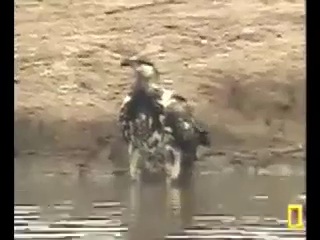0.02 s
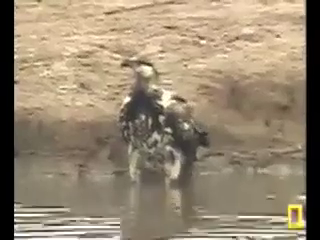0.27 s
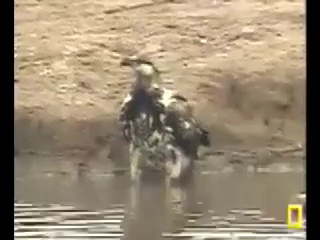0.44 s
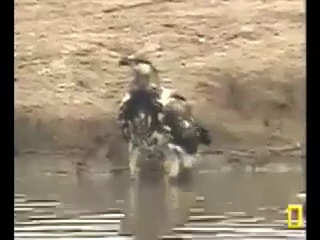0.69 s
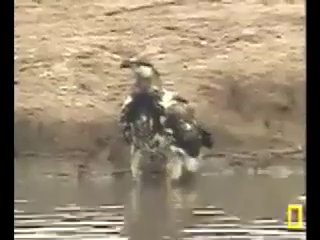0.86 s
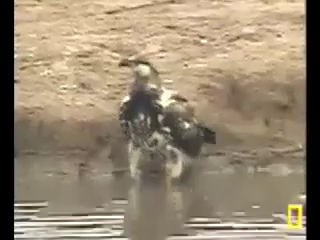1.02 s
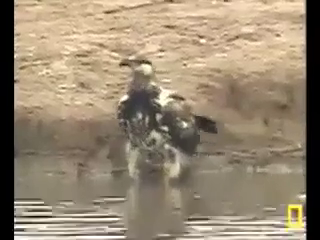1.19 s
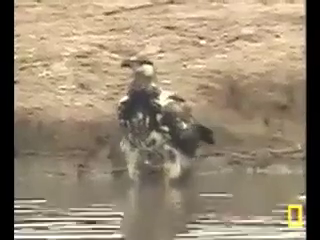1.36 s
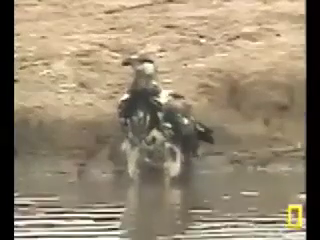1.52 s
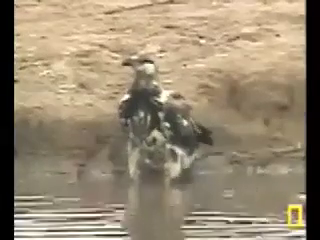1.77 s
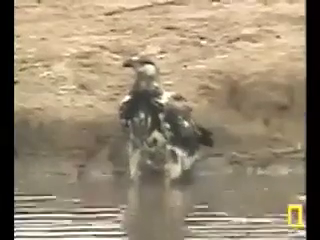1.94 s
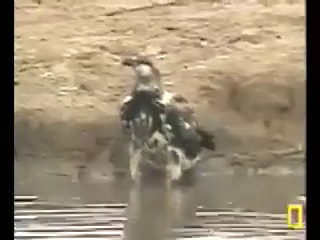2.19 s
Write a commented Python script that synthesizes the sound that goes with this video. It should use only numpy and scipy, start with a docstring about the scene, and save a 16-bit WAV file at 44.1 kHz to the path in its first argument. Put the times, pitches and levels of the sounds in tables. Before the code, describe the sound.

An eagle calls outdoors over soft air and faint distant birds: a downward whistle, then descending yelps growing quicker and quieter. Water swishes and gulps briefly around the first yelps, and light wind buffets the microphone near the end.

```python
"""Over soft outdoor air and faint, far pipes of small birds, a fish eagle gives one falling whistle,
then a run of yelps that sink, quicken and fade; the two sides of its syrinx beat against each other.
The banks of the waterhole echo the birds. Something like stirred water swishes and gulps as the run
begins, and wind bumps the microphone at the end.
The recorder is narrow in band and limits the loud notes. A thin hiss rises and falls with the level."""
import sys
import numpy as np
from scipy import signal
from scipy.fft import rfft, irfft, next_fast_len
from scipy.io import wavfile
from scipy.ndimage import uniform_filter1d, minimum_filter1d, map_coordinates

SR = 44100
rng = np.random.default_rng(int(sys.argv[2]) if len(sys.argv) > 2 else 0)


def generate_wav(sig):
    """Save sig (samples, or channels by samples) to the path in sys.argv[1] as 16-bit PCM at SR."""
    pcm = np.round(np.clip(np.atleast_2d(sig).T, -1, 1) * 32767).astype(np.int16)
    wavfile.write(sys.argv[1], SR, pcm)


N = 97020


def amp(db):
    """Decibel law: 20 dB is a factor of ten in amplitude."""
    return 10 ** (np.asarray(db) / 20)


def unit(x):
    """Normalisation to rms 1."""
    return x / np.sqrt(np.mean(x ** 2) + 1e-20)


def clock():
    """Uniform sampling: the time of each sample in seconds."""
    return np.arange(N) / SR


def level(times_s, db):
    """Amplitude envelope: gain along a dB curve, fading to silence outside it."""
    t = clock()
    inside = ((t >= times_s[0]) & (t <= times_s[-1])).astype(float)
    return amp(np.interp(t, times_s, db)) * uniform_filter1d(inside, size=200)


def wobble(rate):
    """Random modulation: a smooth curve of rms 1 through rate knots a second."""
    knots = rng.standard_normal(size=8192)
    return unit(map_coordinates(knots, [clock() * rate], mode="wrap"))


def filtered(x, response):
    """Linear filtering: the spectrum is multiplied by a frequency response."""
    size = next_fast_len(N + SR // 2)
    return irfft(rfft(x, size) * response(np.fft.rfftfreq(size, 1 / SR)), size)[:N]


def coloured(x, spectrum):
    """Spectral shaping by (frequency_hz, gain_db) points, at rms 1."""
    points_hz, db = np.transpose(spectrum)
    return unit(filtered(x, lambda hz: amp(np.interp(np.log(hz + 1), np.log(points_hz), db))))


def noise(spectrum):
    """Filtered white noise of rms 1."""
    return coloured(rng.standard_normal(N), spectrum)


def patchy_noise(spectrum, depth_db):
    """Time-frequency modulation: noise whose strength varies in short, narrow patches."""
    cells = signal.stft(rng.standard_normal(N), nperseg=1024)[2]
    patches = uniform_filter1d(rng.standard_normal(cells.shape), size=4, axis=0)
    patches = unit(uniform_filter1d(patches, size=4, axis=1))
    mottled = signal.istft(cells * amp(depth_db * patches), nperseg=1024)[1][:N]
    return coloured(mottled, spectrum)


# Spectrum of the outdoor background: frequency_hz, gain_db
AIR_SPECTRUM = [(25, -7), (70, -8), (140, -10), (280, -3.5), (550, 5.5), (1000, 0.5), (2000, -4.5),
                (3000, -2), (3550, -7), (3900, -25.5), (4500, -52.5)]
# Its slow change in strength: time_s, level_db
AIR_ENVELOPE = [(0, -42), (.2, -43), (0.601, -46), (1.4, -45.5), (2.2, -42.5)]


def air():
    """Ambient noise: a soft, broad background that dips and recovers."""
    gain = amp(np.interp(clock(), *np.transpose(AIR_ENVELOPE)))
    return gain * patchy_noise(AIR_SPECTRUM, depth_db=2.44)


def voice(hz, roughness, jitter_hz=16, waver_db=1.8):
    """Random frequency and amplitude modulation spread a pure tone into a narrow band."""
    phase = 2 * np.pi * np.cumsum(hz + jitter_hz * wobble(rate=260)) / SR
    flutter = (wobble(rate=420) + 1j * wobble(rate=420)) / np.sqrt(2)
    tone = np.imag((1 + roughness * flutter) * np.exp(1j * phase))
    return unit(amp(waver_db * wobble(rate=190)) * tone)


def note(start_s, length_s, pitch_hz, fall_hz, db, roughness, attack_s=.017, release_s=.011):
    """Exponential relaxation: a note starts sharp, settles toward its pitch and dies quickly."""
    age = np.maximum(clock() - start_s, 0)
    rise = np.sin(np.pi / 2 * np.minimum(age / attack_s, 1)) ** 2
    decay = np.exp(-np.maximum(age - length_s, 0) / release_s)
    glide_hz = pitch_hz + fall_hz * np.exp(-3.33 * age / length_s)
    return amp(db) * rise * decay * voice(glide_hz, roughness)


# Notes of distant small birds: start_s, length_s, pitch_hz, fall_hz, level_db, roughness
FAR_NOTES = [(0, 0.01, 3436, 60, -43, 0.4), (0.469, 0.056, 3230, 200, -39, 1.5),
             (0.58, 0.029, 1760, 60, -41.5, 0.49), (0.619, 0.042, 2350, 60, -32.5, 0.62),
             (1.515, 0.06, 1738, 50, -42, 1.6), (1.607, 0.013, 3330, 120, -40, 1.1),
             (1.669, .035, 2990, 60, -43.5, 1.8)]


def far_birds():
    """Modulation sidebands smear the pitch of a few faint pipes."""
    return sum(note(*row) for row in FAR_NOTES)


# Main voice of the eagle's whistle: time_s, pitch_hz, level_db
WHISTLE_MAIN = [(.206, 3530, -39), (.219, 3572, -22), (.23, 3325, -15.5), (.241, 3347, -14),
                (.247, 3150, -11.5), (.257, 3170, -13), (.267, 2936, -15), (.275, 3088, -14),
                (.285, 2909, -16.5), (.317, 2927, -10), (.326, 2932, -37), (.34, 2953, -29),
                (.357, 2920, -35)]
# Weaker second voice of the syrinx: time_s, pitch_hz, level_db
WHISTLE_SECOND = [(.25, 3345, -19.5), (0.279, 3240, -37), (0.318, 3304, -28.5), (0.347, 3264, -49),
                  (0.362, 3160, -39.5)]


def eagle_whistle():
    """Biphonation: the syrinx sounds two falling tones at once."""
    call = 0
    for contour in (WHISTLE_MAIN, WHISTLE_SECOND):
        times_s, hz, db = np.transpose(contour)
        call = call + level(times_s, db) * voice(np.interp(clock(), times_s, hz), roughness=.15)
    return call


# Swell and fade of the swish: time_s, relative_level_db
SWISH_ENVELOPE = [(.42, -67), (.56, -41), (.66, -39), (.74, -33), (.79, -32), (.84, -32.5), (.9, -34.5),
                  (1.05, -33.5), (1.11, -35.5), (1.22, -38), (1.33, -48.5), (1.6, -50), (1.75, -54.5)]
# Spectrum of spray and bubbles: frequency_hz, gain_db
SWISH_SPECTRUM = [(400, -37.5), (680, -5.5), (1200, -3.5), (1800, 6), (2400, 8), (3000, 13), (3450, 10),
                  (3800, -4.5), (4200, -69)]


def water_swish(bubbles_per_s=330, decay_cycles=20, bubble_db=-1.5, gain_db=2):
    """Bubble resonance: small bubbles ring as damped oscillators amid the noise of spray."""
    draws = rng.random(size=(2000, 3))[:int(bubbles_per_s * N / SR)]
    when, pitch, strength = draws.T[:, :, None]
    age = np.arange(SR // 20) / SR
    hz = 900 * 4 ** pitch  # spread over two octaves
    peak = (1 - .95 * strength) ** -.5  # many weak, few strong
    rings = peak * np.exp(-hz * age / decay_cycles) * np.sin(2 * np.pi * hz * age)
    index = (when * N).astype(int) + np.arange(len(age))
    bubbles = coloured(np.bincount(index.ravel(), rings.ravel(), N)[:N], SWISH_SPECTRUM)
    spray = patchy_noise(SWISH_SPECTRUM, depth_db=2.5)
    return amp(gain_db) * level(*np.transpose(SWISH_ENVELOPE)) * (spray + amp(bubble_db) * bubbles)


# Deeper gulps of the water: centre_s, half_length_s, level_db
GULP_PULSES = [(0.742, 0.023, -40.5), (0.851, 0.036, -31.5), (1.15, 0.036, -41)]
# Their spectrum: frequency_hz, gain_db
GULP_SPECTRUM = [(200, -29), (450, -19), (720, 2.5), (1250, -3), (1700, -4.5), (3000, -50)]


def water_gulps():
    """Gaussian pulses of band-limited noise are heard as gulps."""
    t = clock()
    pulses = sum(amp(db) * np.exp(-((t - centre) / half) ** 2) for centre, half, db in GULP_PULSES)
    return pulses * noise(GULP_SPECTRUM)


# The eagle's run: start_s, length_s, pitch_hz, fall_hz, level_db, roughness, upper_voice_gain_db
YELP_RUN = [(0.84, .056, 2978, 591, -14.5, 0.48, -15), (0.955, 0.042, 2895, 402, -14.5, 0.42, -15.5),
            (1.055, .048, 2795, 261.8, -17, 0.5, -22.5), (1.132, 0.0475, 2699, 280, -15, 0.3, -25),
            (1.218, .039, 2604, 260, -12, 0, -24), (1.297, 0.029, 2536, 221, -14.5, 0.17, -16),
            (1.366, 0.019, 2487, 210, -17.5, 0.22, -11.5), (1.435, .021, 2363, 380, -19, 0.37, -0.5),
            (1.501, .029, 2318, 335, -21, 0.26, -5), (1.562, 0.026, 2326, 270, -23.5, 0.3, -5),
            (1.629, .023, 2314, 190, -22, 0.2, -7), (1.691, 0.038, 2328, 70.6, -29, 0.22, -6.5),
            (1.751, 0.027, 2335, 70.7, -28.5, 0.3, -9.5), (1.81, .030, 2300, 70.8, -31.5, 0.37, -9.5),
            (1.87, 0.027, 2275, 90, -30, 0.3, -13), (1.925, 0.034, 2304, 59.4, -33, 0.5, -21),
            (1.998, .023, 2027, 280, -37, 0.9, -4.5), (2.052, 0.02, 2094, 100, -42, 0.71, -2)]


def eagle_yelps(beat_hz=198):
    """Beating: the two sides of the syrinx fall together and interfere at their difference frequency."""
    call = 0
    for start, length, hz, fall_hz, db, roughness, upper_db in YELP_RUN:
        lower = note(start, length, hz, fall_hz, db, roughness)
        upper = note(start, length, hz + beat_hz, fall_hz, db + upper_db, roughness)
        call = call + lower + upper
    return call


# Buffets of wind: time_s, level_db
WIND_ENVELOPE = [(1.55, -57.5), (1.596, -36), (1.63, -60.5), (1.70, -47.5), (1.788, -30), (1.881, -34),
                 (1.909, -40.5), (1.969, -34.5), (2.029, -46), (2.07, -48.5), (2.137, -35), (2.165, -60.5),
                 (2.2, -38)]
# Their rumble: frequency_hz, gain_db
WIND_SPECTRUM = [(25, -30), (60, -8), (110, -2), (160, 2), (230, -9.5), (400, -15.5), (700, -33),
                 (2000, -60)]


def wind():
    """Pressure fluctuation: wind on the microphone makes bumps of low noise."""
    return level(*np.transpose(WIND_ENVELOPE)) * noise(WIND_SPECTRUM)


# Reflections from the banks: delay_s, gain_db
BANK_ECHOES = [(.013, -24), (0.023, -17.5), (.037, -13), (.148, -27)]


def banks(x, scatter_t60_s=.066, scatter_db=-9, tail_t60_s=.93, tail_db=-18.5):
    """Reflection and reverberation: distinct bank echoes, ground scatter and a faint long tail."""
    t = clock()
    heard = x + sum(amp(db) * np.interp(t - delay, t, x, left=0) for delay, db in BANK_ECHOES)
    for t60, db in ((scatter_t60_s, scatter_db), (tail_t60_s, tail_db)):
        response = rng.standard_normal(N) * amp(-60 * t / t60)
        heard = heard + amp(db) * signal.fftconvolve(x, response / np.linalg.norm(response))[:N]
    return heard


def scene():
    """Superposition: the birds and their echoes add to water, air and wind in one channel."""
    birds = banks(eagle_yelps() + eagle_whistle() + far_birds())
    return (birds + water_swish() + water_gulps() + air() + wind())[None]


def limiter(x, ceiling_db=-12, knee=4.3, window_s=.001):
    """Soft limiting: the gain drops briefly around each loud peak."""
    width = int(window_s * SR)
    needed_gain = (1 + np.abs(x / amp(ceiling_db)) ** knee) ** (-1 / knee)
    return x * uniform_filter1d(minimum_filter1d(needed_gain, width), width)


# Spectrum of a thin hiss that rises and falls with the sound's loudness: frequency_hz, gain_db
HISS_SPECTRUM = [(30, 0), (4000, -0.5), (8500, -1), (9600, -3.5), (10300, -11.5), (10900, -24.5)]


def hiss(x, relative_db=-21.5, corner_hz=1980, window_s=.001):
    """Signal-dependent noise: hiss follows the short-term rms of the signal's treble."""
    treble = filtered(x, lambda hz: hz / np.hypot(hz, corner_hz))
    treble_rms = np.sqrt(np.abs(uniform_filter1d(treble ** 2, int(window_s * SR))))
    return amp(relative_db) * treble_rms * noise(HISS_SPECTRUM)


def record(dry):
    """Band limiting: the limited signal and its hiss are cut off at 11 kHz."""
    limited = limiter(dry[0])
    return filtered(limited + hiss(limited), lambda hz: hz < 11000)[None]


dry = scene()
out = record(dry)
generate_wav(out)
```